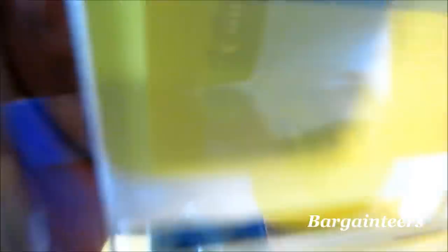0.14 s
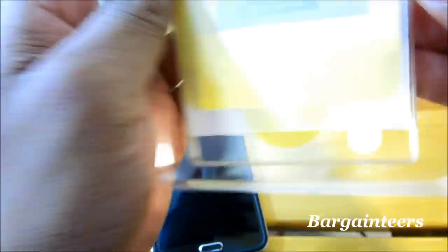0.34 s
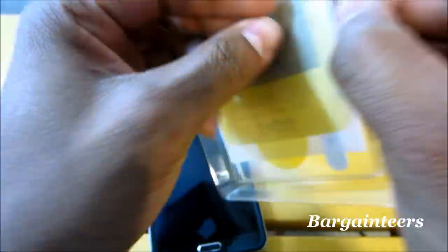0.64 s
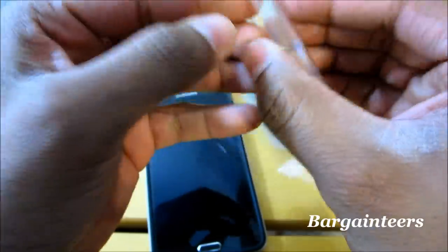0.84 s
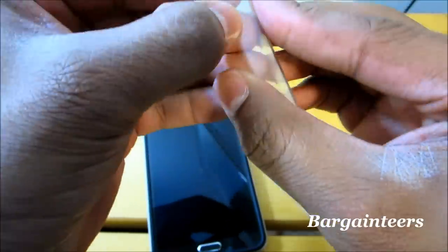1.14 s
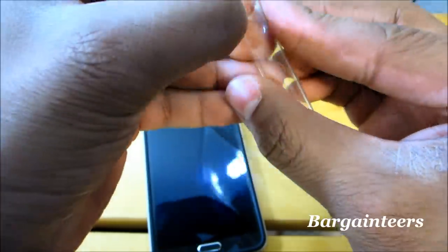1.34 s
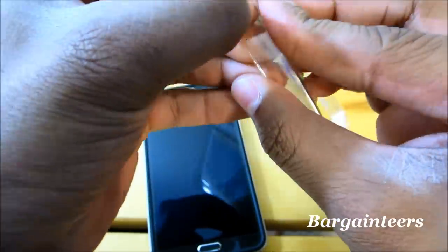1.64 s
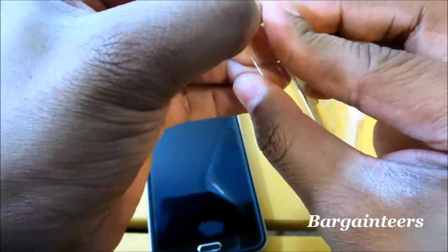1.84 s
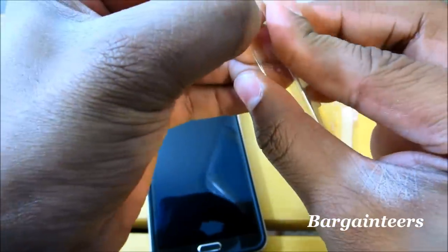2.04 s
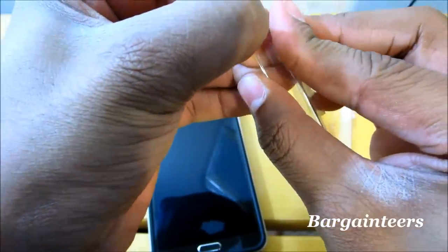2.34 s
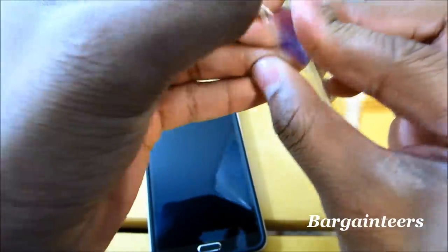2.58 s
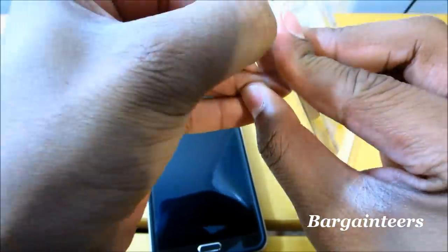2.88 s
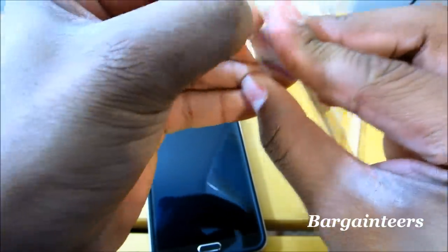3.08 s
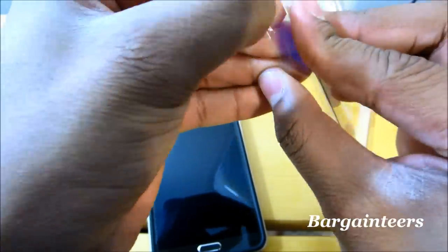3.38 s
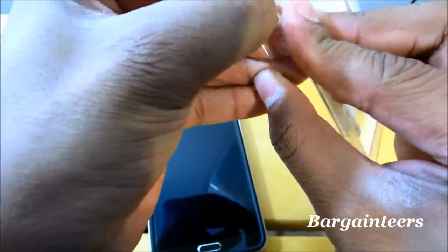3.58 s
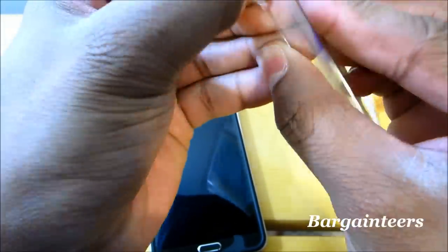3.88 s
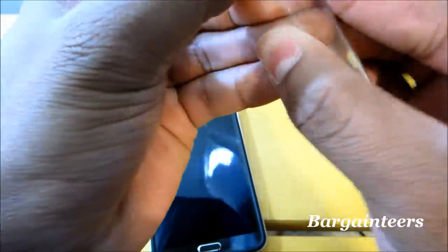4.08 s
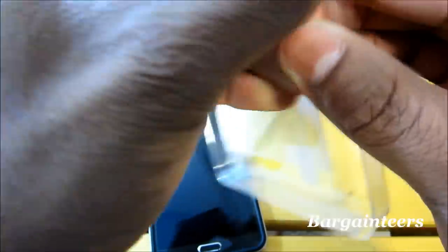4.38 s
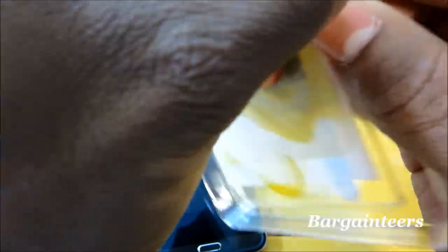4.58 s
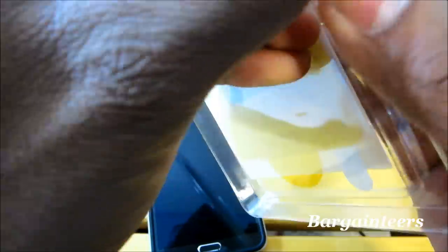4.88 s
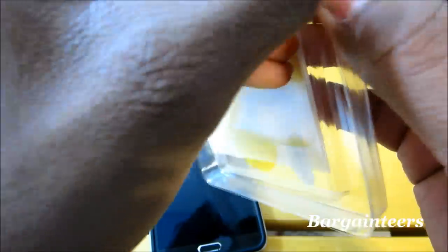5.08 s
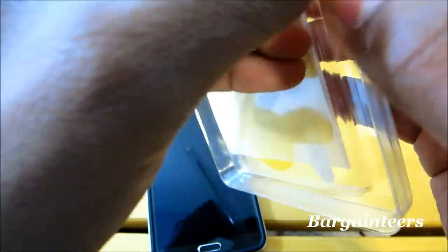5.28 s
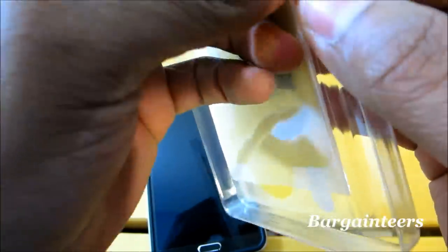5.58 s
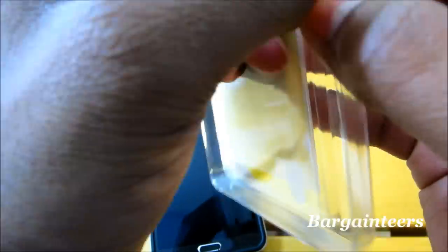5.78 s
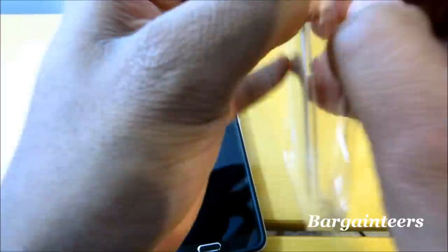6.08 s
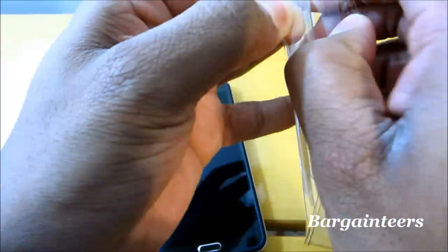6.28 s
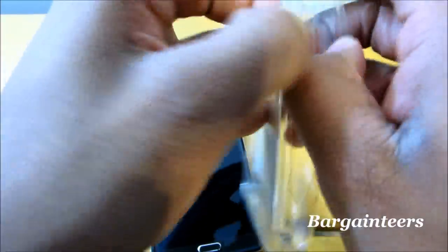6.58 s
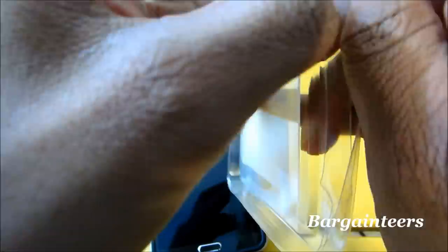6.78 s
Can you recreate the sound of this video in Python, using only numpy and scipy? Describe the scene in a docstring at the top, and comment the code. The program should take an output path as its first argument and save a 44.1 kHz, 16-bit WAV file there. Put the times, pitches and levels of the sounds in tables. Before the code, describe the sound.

Thin rigid plastic packaging buckles loudly at first, pops once mid-way, then crinkles, scrapes and ticks in clusters over soft room hum.

```python
"""A small room hums quietly; close to a pair of microphone ports, palms slide with a soft low rumble.
Two hands turn a clear plastic blister pack and pick at its tape: stiff facets buckle with sharp snaps,
whole walls pop hollow, fingertips tap and scrape, and breaking glue ticks and crackles finely.
Noise and kicks through resonances make the pack, swelling or dying sines its bumps and knocks.
The room answers with diffuse echo; the recorder clips, eases its gain down after peaks and trims both ends."""
import sys
import numpy as np
from scipy import signal
from scipy.fft import rfft, irfft, next_fast_len
from scipy.io import wavfile
from scipy.ndimage import map_coordinates

SR = 44100
rng = np.random.default_rng(int(sys.argv[2]) if len(sys.argv) > 2 else 0)


def to_wav(s):
    """Save 16-bit WAV."""
    ch = np.atleast_2d(s).T  # columns
    pcm = np.round(np.clip(ch, -1, 1) * 32767)  # PCM
    wavfile.write(sys.argv[1], SR, pcm.astype(np.int16))


N = 305651  # length in samples

# Levels are those ahead of the recorder; resonance and spectrum levels only weigh the rows of one table.

# Spectrum of the room's hum. Each row: frequency in Hz, level in dB per Hz.
HUM_SPECTRUM = [(15, -44.5), (25, -9.5), (209, 0), (820, -12), (2000, -17.5), (2700, -24), (4200, -28.5),
                (10100, -33), (15500, -35)]
# How alike the hum is at both ports. Each row: frequency in Hz, correlation.
HUM_CORRELATION = [(60, 0.83), (130, 1), (290, 0.061), (7000, 0.042)]
HUM_DB = -55.5

# Hold of the fingers between strokes. Each row: time in seconds, rubbing in dB.
GRIP = [(0, -66.5), (.2, -58), (.58, -67), (.92, -61.5), (1.25, -67.5), (1.8, -75.5), (2.4, -68),
        (2.72, -72.5), (3.3, -77), (3.7, -63), (4.4, -59.5), (4.85, -59.5), (5.6, -64.5), (6.0, -56),
        (6.93, -62)]
GRIP_CRACKLE_DB = -7  # drive of the edge crackle re that rubbing
GRIP_HZ, GRIP_WANDER = 1570, .5  # pitch of the patch under the holding fingers; its spread in octaves
# Strokes of a fingertip or nail. Each row: start in seconds, length in seconds, rubbing in dB,
# drive of the tape and edge crackle in dB, pitch of the pressed patch at full strength in Hz.
STROKES = [(0.237, 0.051, -40, -75, 2760), (0.295, 0.005, -22, -30, 2940), (0.514, 0.015, -28.5, -35, 1970),
           (0.62, 0.06, -42, -52, 2420), (0.723, 0.055, -55, -62, 2090), (1.061, 0.03, -54.5, -60.5, 1865),
           (1.44, 0.067, -60, -68, 510), (2.513, 0.033, -41, -52.5, 2500),
           (2.873, 0.023, -50.5, -62.5, 600), (3.1, 0.041, -74, -63.5, 650),
           (3.152, 0.042, -59, -66.5, 2600), (4.251, 0.029, -38.5, -43.5, 1570),
           (4.457, 0.043, -45.5, -56.5, 3580), (4.521, 0.055, -45.5, -48, 2800),
           (5.053, 0.0223, -38.5, -46, 3310), (5.195, 0.065, -52, -46, 4010),
           (5.239, 0.029, -38.5, -42, 3490), (5.361, 0.031, -45, -49, 3620),
           (5.654, 0.0097, -41, -72, 2910), (5.893, 0.094, -42, -51.5, 1890),
           (6.154, 0.016, -38.5, -54, 2350), (6.316, 0.016, -35, -52, 2790),
           (6.402, 0.042, -45.5, -56, 3660), (6.446, 0.066, -41, -51, 3750),
           (6.613, 0.05, -47, -53.5, 3540), (6.662, 0.093, -50.5, -54.5, 2174),
           (6.756, 0.061, -40, -50, 3610), (6.884, 0.068, -40.5, -44.5, 2390)]
# Every stroke catches at full strength, holds that level, then eases off and lifts.
CATCH_S, LIFT_S = 0.012, 0.029
CATCH_DB, EASE_DB, SILENT_DB = 0, -6, -36.5  # re full strength
HOLD_SHARE = 0.8  # of the stroke's length
PATCH_BEND = 0.098  # octaves by which the patch rises as the finger catches, and sinks again as it lifts
# Resonances of the rubbed sheet. Each row: centre in Hz, width in Hz, level in dB.
RUBBED_SHEET = [(700, 1400, 6.5), (1268, 1300, 16), (1640, 830, -12.5), (2110, 950, -10.5),
                (2870, 790, 5.5), (3370, 540, 1), (3620, 270, -5)]
# Spectrum of the peeling crackle. Each row: frequency in Hz, level in dB per Hz.
PEEL_SPECTRUM = [(2400, -28.5), (4200, -7.5), (7000, -11.5), (9500, -13), (12000, -13), (14500, -18),
                 (16000, -13)]

# The palms' slide as the hands turn the pack.
TURN_START_S, TURN_LENGTH_S, TURN_DB = 0.011, 0.65, -55.5

# Snaps of the sheet. Each row: time in seconds, level in dB, pitch of the buckling facet in Hz,
# shell body in dB re level, crack in dB re level.
SNAPS = [(0.2214, -31, 2620, -4, -41), (0.3006, -10.5, 2570, -7, -16), (0.3029, -10, 2850, -10.5, -10),
         (.325, -26.5, 2240, -13, -7), (0.3715, -22.5, 2050, -24, -18), (0.3848, -6.5, 2320, -15, -20.5),
         (.406, -23, 2240, -2, -22), (0.413, -11, 3560, -19, -26), (0.523, -21.5, 2350, -3, -11),
         (0.6073, -35.5, 2120, -6.5, 3), (0.6254, -27.5, 4100, -10.5, 4.5), (0.6507, -25.5, 4100, -21, -3),
         (0.6534, -27.5, 2280, -1.5, 1), (.664, -21.5, 2370, -15, -2.5), (0.7371, -21, 2280, -14, -1.5),
         (0.789, -36.5, 1800, -24, -3.5), (0.7994, -35.5, 1640, -9, -16), (0.9421, -40, 2600, -5, -4),
         (1.1768, -42.5, 5300, -7, -7), (1.528, -36, 2190, -13, -0.5), (2.501, -8.5, 1740, -5, -32),
         (2.5018, -14, 3850, -6.5, -1), (2.8051, -42, 1900, 2.5, -11), (2.867, -42.5, 1830, 5, -13),
         (3.1225, -37, 1520, 12.5, -5), (3.411, -34.5, 1750, 0.5, -35), (3.5624, -36, 2350, 2.5, -36),
         (3.602, -40, 1680, 1, -29), (3.6746, -30.5, 1110, 7, -10), (3.9306, -35, 1950, -15, -7),
         (3.9918, -18, 2720, -12.5, -3.5), (3.9961, -19.5, 2330, -18, -9), (4.001, -22, 2380, -14.5, 1.5),
         (4.2047, -30.5, 3620, -34, 17.5), (4.215, -11, 3610, -15.5, 4.5), (4.4762, -28.5, 2800, -1.5, -15),
         (4.5927, -33.5, 1250, -3, -11), (4.604, -26, 2560, 0, -15), (4.6157, -32.5, 2430, -27, -9),
         (5.0153, -32, 4540, -19, -9), (5.0727, -22.5, 3230, -11, -6.5), (5.1012, -35, 3300, -5, 4),
         (5.1368, -26, 2120, -8, -3), (5.1421, -28.5, 3500, -26, 9), (5.1674, -18, 3640, -38, 2.5),
         (5.2087, -27.5, 4000, -17, 9), (5.222, -29.5, 5650, -27, 7), (5.251, -22, 3540, -20, 1.5),
         (5.259, -24, 3500, -9.5, -1), (5.4094, -36.5, 4150, -14.5, 13.5), (5.485, -32, 1920, -11.5, -17),
         (5.636, -21, 2920, -9.5, 5), (5.8985, -28.5, 1670, -5, 1), (5.9119, -16, 4930, -20.5, 2.5),
         (5.9308, -24.5, 1820, -17, -4), (5.9426, -28, 3400, -15, -15), (5.9627, -20, 4900, -18.5, 1.5),
         (6.0358, -35, 1350, -4, -4), (6.0451, -27.5, 1090, -2.5, 2), (6.01, -38, 4300, 0.5, -7),
         (6.2396, -40.5, 4190, -25, -6), (6.2944, -24, 2730, -11, -6.5), (6.3149, -23, 2830, -10, -21),
         (6.37, -32, 3040, -30, -22), (6.4729, -23, 2960, -11, -12), (6.4816, -33.5, 3580, -29, 3),
         (6.548, -34, 2080, -13, -34), (6.6437, -31, 3430, -24, -22), (6.8714, -38.5, 2960, -15, -5),
         (6.8867, -36.5, 2930, -10, -11), (6.9062, -31.5, 2400, -12, -15), (6.9275, -15, 5700, -14, -3.5)]
# Modes of the whole shell. Each row: centre in Hz, width in Hz, level in dB.
SHELL_MODES = [(167.6, 190, -3), (320, 550, -7), (524, 230, -7.5), (757, 150, 4)]
# Resonances of the flat sheet. Each row: centre in Hz, width in Hz, level in dB.
FLAT_SHEET = [(1330, 350, 2.5), (1790, 330, 2.5), (2180, 610, 4), (2620, 4200, -10.5), (3330, 530, 3.5)]
# Resonances that colour the crack. Each row: centre in Hz, width in Hz, level in dB.
CRACK_COLOUR = [(6400, 660, -8.5), (7900, 3600, -4), (11030, 3100, 1.5), (12300, 1600, 0.5)]

# Soft bumps of the hands. Each row: time in seconds, level at the top of the swell in dB, pitch in Hz.
BUMPS = [(0.246, -45.5, 75), (0.379, -39, 68), (0.537, -38.5, 72), (0.725, -45.5, 64), (3.118, -42.5, 98),
         (3.678, -41, 106), (5.255, -38.5, 133), (6.171, -40.5, 57.4)]
# Hollow knocks of the shell. Each row: time in seconds, level that its modes refer to in dB, pitch in Hz.
KNOCKS = [(.3027, -15, 900), (0.4139, -20.5, 505), (2.501, -7, 506), (3.124, -39, 764), (4.257, -30, 467),
          (5.637, -22.5, 863), (6.123, -29.5, 530)]
# Ringing of a popped wall. Each row: multiple of the knock's pitch, level in dB re the knock, t60 in seconds.
WALL_MODES = [(.72, -2, 0.014), (1, -0.5, 0.027), (1.3, -0.5, 0.0086)]
# Single breaks of the glue. Each row: time in seconds, level in dB.
GLUE_TICKS = [(0.496, -47), (0.526, -37), (0.619, -34), (.6403, -35), (1.5361, -41), (3.0256, -54),
              (3.189, -39.5), (3.436, -51.5), (3.635, -59), (3.774, -52.5), (4.0525, -28.5), (4.356, -45.5),
              (4.879, -39.5), (4.9035, -46), (5.095, -32), (5.1113, -37), (5.1275, -36), (5.192, -24),
              (5.1986, -23), (5.2334, -35), (5.243, -22), (5.3635, -28), (5.3853, -33), (5.9494, -27),
              (5.9715, -40), (5.7735, -40.5), (6.0729, -42)]
# Soft fingertip taps. Each row: time in seconds, wall level before the low-pass in dB,
# pitch of the touched wall in Hz.
TAPS = [(0.91, -46, 1110), (1.064, -47, 1890), (1.154, -45, 1870), (1.381, -47.5, 960), (1.467, -39.5, 553),
        (1.585, -45, 765), (1.874, -49, 750), (2.2372, -41, 755), (2.3268, -42.5, 767), (2.7575, -44, 840),
        (3.0596, -45, 853), (3.0806, -46.5, 1890), (3.099, -39.5, 680), (3.301, -48, 780),
        (3.486, -40.5, 812), (4.2552, -28.5, 1600), (4.274, -36, 2090), (4.9238, -44, 1100),
        (6.256, -46, 1130), (6.681, -45, 1710), (6.6917, -38.5, 1250), (6.7842, -32, 1570)]

# One long pull on the tape, swelling and easing off.
PULL_START_S, PULL_LENGTH_S, PULL_DB, PULL_FADE_SHARE = 4.645, 0.19, -49, 0.44
# Resonances of the taut strip. Each row: centre at mid-pull in Hz, width in Hz, level in dB.
STRIP = [(4380, 1800, 11.5), (9500, 10500, 18), (10400, 1600, 4)]
STRIP_SAG, STRIP_WANDER = 0.68, 0.054  # as the strip lengthens: octaves lost per s; waver in octaves

# Which way the pack lies. Each row: time in seconds, lag of the left port in samples, left minus right in dB.
BEARING = [(.42, 3.6, -1.3), (.65, 1.3, .3), (1.5, .2, -.3), (3.7, -.3, -1.3), (4.25, .6, -.3),
           (5.3, 1.3, 1.3), (5.9, 1.3, .8), (6.3, 1.2, -1)]
# Strength of the room's echo. Each row: frequency in Hz, level in dB.
ROOM_LEVEL = [(150, -32.5), (500, -16), (1000, -15), (2000, -12), (3600, -16.5), (12000, -19.5)]
# Decay of the room's echo. Each row: frequency in Hz, t60 in seconds.
ROOM_DECAY = [(150, 0.29), (2000, 0.25), (12000, 0.16)]
CUTOFF_HZ = 15800


def from_db(db):
    """Decibels to gain."""
    return 10 ** (np.asarray(db) / 20)


def rms_one(x):
    """Scale to an rms of 1."""
    return x / np.sqrt(np.mean(x ** 2) + 1e-20)


def per_ms(x):
    """Scale each row to the energy of one millisecond at rms 1."""
    energy = np.sum(x ** 2, axis=-1, keepdims=True)
    return x / np.sqrt(energy * 1000 / SR + 1e-20)


def in_time(rows):
    """Each column of a timed table as a curve, one value per sample."""
    s, *columns = np.transpose(rows)
    return [np.interp(np.arange(N) / SR, s, column) for column in columns]


def at_hz(points, hz):
    """Read a table on a log-frequency axis."""
    points = np.array(points)
    return np.interp(np.log(np.maximum(hz, 1)), np.log(points[:, 0]), points[:, 1])


def colour(x, spectrum):
    """Give a steady sound a spectrum; rms 1."""
    size = next_fast_len(N)
    gain = from_db(at_hz(spectrum, np.fft.rfftfreq(size, 1 / SR)))
    return rms_one(irfft(rfft(x, size) * gain, size)[..., :N])


def drift(per_s):
    """Slow chance: random points, per_s of them each second, joined by lines; rms 1."""
    position = np.arange(N) * per_s / SR
    points = rng.standard_normal(N // 40)
    return rms_one(np.interp(position, np.arange(N // 40), points))


def resonate(x, hz, width_hz):
    """One resonance, gain 1 on top."""
    r = np.exp(-np.pi * width_hz / SR)
    zeros = np.array([1, 0, -1]) * (1 - r * r) / 2
    poles = [1, -2 * r * np.cos(2 * np.pi * hz / SR), r * r]
    return signal.lfilter(zeros, poles, x)


def modes(x, table):
    """Resonances in parallel."""
    return sum(from_db(db) * resonate(x, hz, width) for hz, width, db in table)


def glide(x, hz, width_hz):
    """A resonance whose centre follows a curve: shift it down to zero, smooth, shift back."""
    turn = np.exp(2j * np.pi * np.cumsum(hz) / SR)
    r = np.exp(-np.pi * width_hz / SR)
    return np.real(turn * signal.lfilter([1], [1, -2 * r, r * r], x / turn))


def cut(x, hz, kind, order=2):
    """Butterworth high- or low-pass."""
    return signal.sosfilt(signal.butter(order, min(hz, .45 * SR), kind, fs=SR, output="sos"), x)


def add(out, s, sound):
    """Mix a sound in at a time."""
    start = int(np.clip(round(s * SR), 0, N - 1))
    out[start:start + len(sound)] += sound[:N - start]


def stereo_noise(alike, mid, side):
    """Blend two independent noises into a left and right of given correlation."""
    return np.sqrt(1 + alike) * mid + np.sqrt(1 - alike) * side * [[1], [-1]]


def hum():
    """Steady low room noise, alike at both ports only in the bass."""
    size = next_fast_len(N)
    alike = np.clip(at_hz(HUM_CORRELATION, np.fft.rfftfreq(size, 1 / SR)), 0, 1)
    mid, side = rfft(rng.standard_normal((2, size)))
    air = irfft(stereo_noise(alike, mid, side), size)
    return from_db(HUM_DB) * colour(air, HUM_SPECTRUM)


def contact():
    """Strength of rubbing and crackle, and pitch of the pressed patch: the grip plus every stroke."""
    t = np.arange(N) / SR
    grip_db, = in_time(GRIP)
    # powers add up, gains would not
    rub_power = from_db(grip_db) ** 2
    peel_power = from_db(grip_db + GRIP_CRACKLE_DB) ** 2
    patch_hz = GRIP_HZ * 2 ** (GRIP_WANDER * drift(8.3))
    for start, length, rub_db, peel_db, hz in STROKES:
        corners = start + np.array([-CATCH_S, 0, length * HOLD_SHARE, length, length + LIFT_S])
        during = slice(*np.searchsorted(t, corners[[0, -1]]))
        shape_db = np.interp(t[during], corners, [SILENT_DB, CATCH_DB, 0, EASE_DB, SILENT_DB])
        rub_power[during] += from_db(rub_db + shape_db) ** 2
        peel_power[during] += from_db(peel_db + shape_db) ** 2
        patch_hz[during] = hz * 2 ** (PATCH_BEND * (from_db(shape_db) - 1))
    return np.sqrt(rub_power), np.sqrt(peel_power), patch_hz


def slips(per_s, spread_db, smooth_db, clump_db):
    """Stick and slip: clumps of tiny uneven clicks over a smooth hiss."""
    size_db = spread_db * np.minimum(rng.exponential(1, N), 4)
    sizes = from_db(size_db) * rng.choice([-1, 1], N)
    clicks = rms_one(sizes * (rng.random(N) < per_s / SR))
    hiss = from_db(smooth_db) * rng.standard_normal(N)
    return (clicks + hiss) * from_db(clump_db * drift(110))


def friction(drag, peeling, patch_hz, peel_gain_db=3.0, rub_edge_hz=4300,
             patch_db=-1.0, patch_width_hz=750, patch_waver=.12):
    """Fingertips drag and the pressed patch rings along; the glue lets go in finer, brighter slips."""
    coarse = slips(per_s=900, spread_db=3.6, smooth_db=-12, clump_db=2.4)
    fine = slips(per_s=2200, spread_db=3.0, smooth_db=-2, clump_db=1.8)
    sheet = rms_one(cut(modes(coarse, RUBBED_SHEET), rub_edge_hz, "low", order=6))
    wavering_hz = patch_hz * 2 ** (patch_waver * drift(90))  # waver in octaves
    patch = rms_one(glide(coarse, wavering_hz, patch_width_hz))
    rub = rms_one(sheet + from_db(patch_db) * patch)
    crackle = colour(fine, PEEL_SPECTRUM)
    return drag * rub + from_db(peel_gain_db) * peeling * crackle


def ticks(drag, peeling, per_s=55, above_db=3.0, limit_db=-50, spread_db=1.5, crack_db=-5):
    """Tiny creases let go at random, as hard as the fingers work the sheet, up to a ceiling."""
    born = rng.random(N) < per_s / SR
    clicks = born * from_db(above_db + spread_db * np.clip(rng.standard_normal(N), -2, 2))
    ceiling = from_db(limit_db)
    kick = signal.unit_impulse(600)
    ring = signal.fftconvolve(clicks * np.minimum(drag, ceiling), per_ms(modes(kick, RUBBED_SHEET)))
    crack = signal.fftconvolve(clicks * np.minimum(peeling, ceiling), per_ms(modes(kick, CRACK_COLOUR)))
    return (ring + from_db(crack_db) * crack)[:N]


def rumble(centre_hz=100, width_hz=70):
    """Palms slide and shift their hold: an uneven low rumble that swells and fades."""
    turning = np.zeros(N)
    add(turning, TURN_START_S, from_db(TURN_DB) * signal.windows.tukey(int(TURN_LENGTH_S * SR)))
    once = resonate(rng.standard_normal(N), centre_hz, width_hz)
    return turning * rms_one(resonate(once, centre_hz, width_hz))


def buckle(kick, decay_s, flutter_db, flutter_s, count, size=1500):
    """Force of each snap: a kick, bending waves that cross the facet, a weaker or longer flutter."""
    t = np.arange(size) / SR
    fading = np.exp(-t / decay_s) + from_db(flutter_db) * np.exp(-t / flutter_s)
    force = rng.standard_normal((count, size)) * fading
    force[:, 0] += kick
    return force


def snaps(facet_db=0.5, facet_q=5.9, bend_cycles=4.0, low_edge_share=0.3, high_edge_hz=6500,
          crack_edge_hz=5500, shell_edge_hz=1000, shell_bottom_hz=95, lead_s=0.00032):
    """A facet flips: the shell gives way first, then the facet cracks, rings and shakes the sheet."""
    s, level_db, facet_hz, body_db, crack_db = np.transpose(SNAPS)
    count = len(SNAPS)

    force = buckle(kick=8.5, decay_s=bend_cycles / facet_hz[:, None], flutter_db=-9,
                   flutter_s=0.0041, count=count)
    facet = per_ms(np.array([resonate(f, hz, hz / facet_q) for f, hz in zip(force, facet_hz)]))
    sheet = per_ms(modes(force, FLAT_SHEET))
    both = sheet + from_db(facet_db) * facet
    # a small, high facet is over sooner and cannot drive the long waves of the sheet
    waves = [cut(wave, low_edge_share * hz, "high") for wave, hz in zip(both, facet_hz)]
    ring = per_ms(cut(np.array(waves), high_edge_hz, "low"))

    crack_force = buckle(kick=5.4, decay_s=0.0004, flutter_db=-5.5, flutter_s=0.0028, count=count)
    crack = per_ms(cut(modes(crack_force, CRACK_COLOUR), crack_edge_hz, "high", order=4))

    shell_force = buckle(kick=10.0, decay_s=0.0021, flutter_db=-12.0, flutter_s=0.015, count=count)
    shell = modes(shell_force, SHELL_MODES)
    body = per_ms(cut(cut(shell, shell_edge_hz, "low"), shell_bottom_hz, "high"))

    out = np.zeros(N)
    for k, start in enumerate(s):
        add(out, start - lead_s, from_db(level_db[k] + body_db[k]) * body[k])
        add(out, start, from_db(level_db[k]) * (ring[k] + from_db(crack_db[k]) * crack[k]))
    return out


def bumps(rise_cycles=0.49, size=6000):
    """Soft flesh pushes the pack: a low swing of two or three cycles."""
    out = np.zeros(N)
    for s, peak_db, hz in BUMPS:
        cycles = np.arange(size) / SR * hz
        swell = cycles / rise_cycles
        add(out, s, from_db(peak_db) * swell * np.exp(1 - swell) * np.sin(2 * np.pi * cycles))
    return out


def knocks(size=3000):
    """When a whole wall of the pack pops through, its low modes ring on for a moment."""
    out, t = np.zeros(N), np.arange(size) / SR
    for s, level_db, hz in KNOCKS:
        for k, (multiple, mode_db, t60) in enumerate(WALL_MODES):
            sign = (-1) ** k  # neighbouring modes swing in opposite directions
            decay = np.exp(-np.log(1000) * t / t60)
            tone = np.sin(2 * np.pi * multiple * hz * t)
            add(out, s, sign * from_db(level_db + mode_db) * decay * tone)
    return out


def glue_ticks(edge_hz=3600):
    """A thread of glue breaks: only the crack sounds, the sheet stays still."""
    force = buckle(kick=6.2, decay_s=0.00019, flutter_db=2, flutter_s=0.0016, count=len(GLUE_TICKS))
    out = np.zeros(N)
    for push, (s, level_db) in zip(force, GLUE_TICKS):
        crack = per_ms(cut(modes(push, CRACK_COLOUR), edge_hz, "high"))
        add(out, s, from_db(level_db) * crack)
    return out


def taps(wall_q=4.5, sheet_db=-3.0, edge_hz=3000):
    """A fingertip lands or slips off: the wall gives a short, hollow note and the sheet a dull tick."""
    force = buckle(kick=4.1, decay_s=0.0016, flutter_db=-12.5, flutter_s=0.018, count=len(TAPS))
    out = np.zeros(N)
    for push, (s, level_db, hz) in zip(force, TAPS):
        wall = per_ms(resonate(push, hz, hz / wall_q))
        sheet = per_ms(modes(push, RUBBED_SHEET))
        add(out, s, from_db(level_db) * (wall + from_db(sheet_db) * sheet))
    return cut(out, edge_hz, "low", order=4)


def tape():
    """The taut strip lets go in fits and colours its crackle with high bands that sink as it lengthens."""
    pull = np.zeros(N)
    swell = signal.windows.tukey(int(PULL_LENGTH_S * SR), PULL_FADE_SHARE)
    add(pull, PULL_START_S, from_db(PULL_DB) * swell)
    crackle = slips(per_s=1300, spread_db=3.5, smooth_db=-8, clump_db=2.2)
    since_start_s = np.clip(np.arange(N) / SR - PULL_START_S, 0, PULL_LENGTH_S)
    from_middle_s = since_start_s - PULL_LENGTH_S / 2
    tension = 2 ** (STRIP_WANDER * drift(40) - STRIP_SAG * from_middle_s)
    bands = sum(from_db(db) * rms_one(glide(crackle, hz * tension, width)) for hz, width, db in STRIP)
    return pull * rms_one(bands)


def ports(x, scatter_hz=2200, scatter_db=-11):
    """Two microphone ports: the left is offset in time and level; moving hands scatter treble to each."""
    lag, pan_db = in_time(BEARING)
    left = map_coordinates(x, [np.arange(N) - lag], order=3)
    out = np.array([left, x])
    treble = cut(x, scatter_hz, "high")
    for delay in rng.integers(6, 45, 5):  # samples
        reflection = from_db(scatter_db) * drift(15) * treble
        # a reflection from the side reaches the ports out of step
        out[:, delay:] += reflection[:-delay] * [[1], [-1]]
    return out * from_db(pan_db * [[.5], [-.5]])


def room(x, onset_s=0.0014, likeness=0.3, size=16000):
    """A small furnished room: octave bands of diffuse echo, each dying at its own rate."""
    t, answer = np.arange(size) / SR, 0
    for hz in 110 * 2. ** np.arange(8):
        mid, side = rng.standard_normal((2, size))
        tail = stereo_noise(likeness, mid, side)
        tail = tail * from_db(-60 * t / at_hz(ROOM_DECAY, hz))
        tail = tail * (1 - np.exp(-(t / onset_s) ** 2))
        tail = rms_one(tail) / np.sqrt(size) * from_db(at_hz(ROOM_LEVEL, hz))
        band = signal.butter(2, [hz / np.sqrt(2), hz * np.sqrt(2)], "band", fs=SR, output="sos")
        answer = answer + signal.sosfilt(band, tail)
    return signal.fftconvolve(x[None], answer, axes=1)[:, :N]


def scene():
    """The pack close up, its echo, the hands and the room."""
    drag, peeling, patch_hz = contact()
    pack = friction(drag, peeling, patch_hz) + ticks(drag, peeling)
    pack = pack + snaps() + knocks() + glue_ticks() + taps() + tape()
    return hum() + rumble() + bumps() + ports(pack) + room(pack)


def gain_control(x, threshold_db=-9, share=0.31, release_db_per_s=9, attack_s=0.013):
    """A loud peak turns the gain down a little, too late for the peak itself; it then creeps back."""
    peak_db = 20 * np.log10(np.abs(x).max(axis=0) + 1e-9)
    over_db = np.maximum(peak_db - threshold_db, 0)
    recovery_db = release_db_per_s * np.arange(N) / SR
    held_db = np.maximum.accumulate(share * over_db + recovery_db) - recovery_db
    r = np.exp(-1 / (attack_s * SR))
    return x * from_db(-signal.lfilter([1 - r], [1, -r], held_db))


def record(dry, low_cut_hz=36):
    """Peaks past full scale clip, loud ones duck the gain; the deepest bass and the top are cut."""
    clipped = np.clip(dry, -1, 1)
    without_bass = cut(gain_control(clipped), low_cut_hz, "high")
    return signal.sosfilt(signal.ellip(10, .1, 70, CUTOFF_HZ, fs=SR, output="sos"), without_bass)


dry = scene()
out = record(dry)
to_wav(out)
```